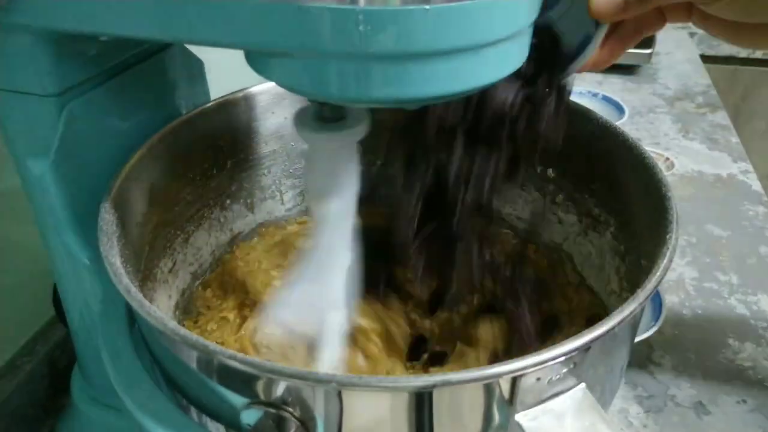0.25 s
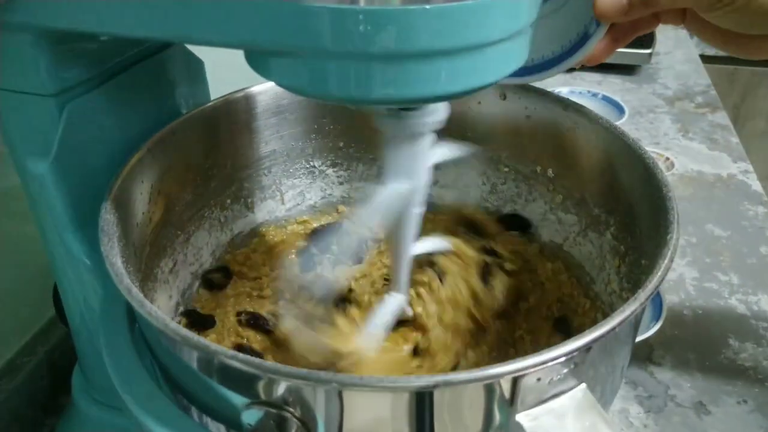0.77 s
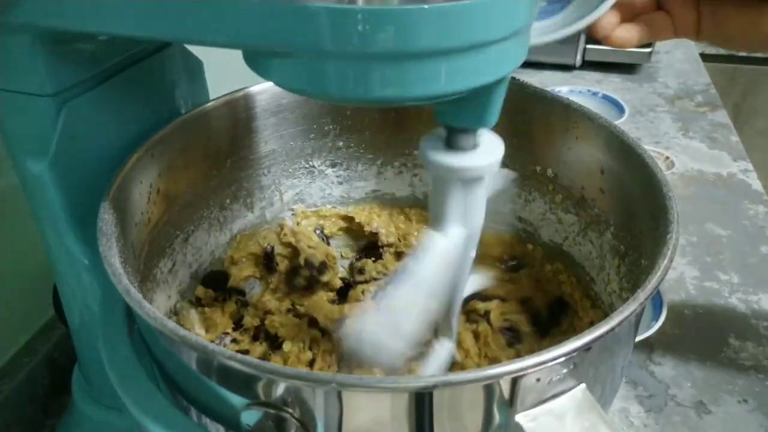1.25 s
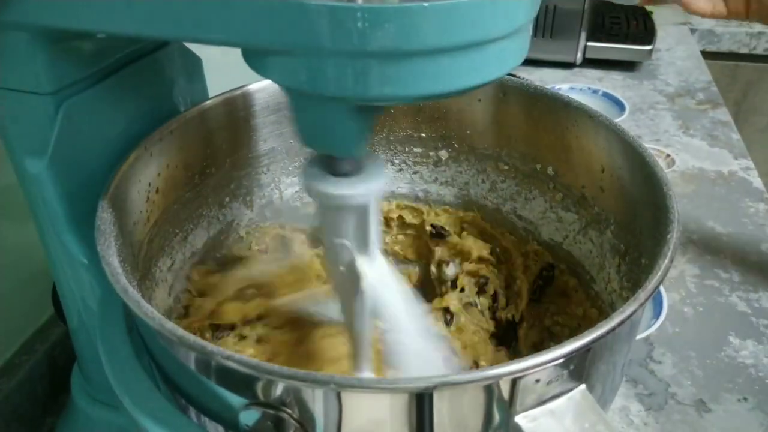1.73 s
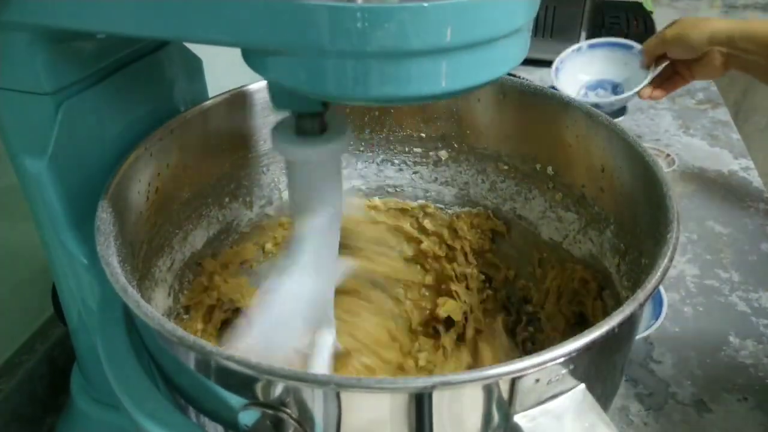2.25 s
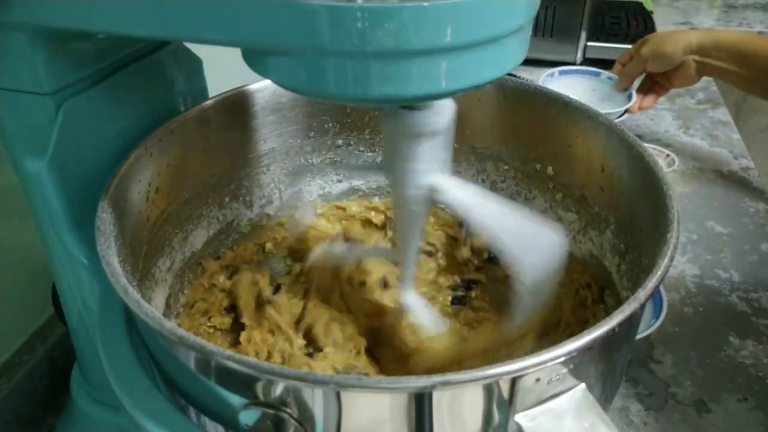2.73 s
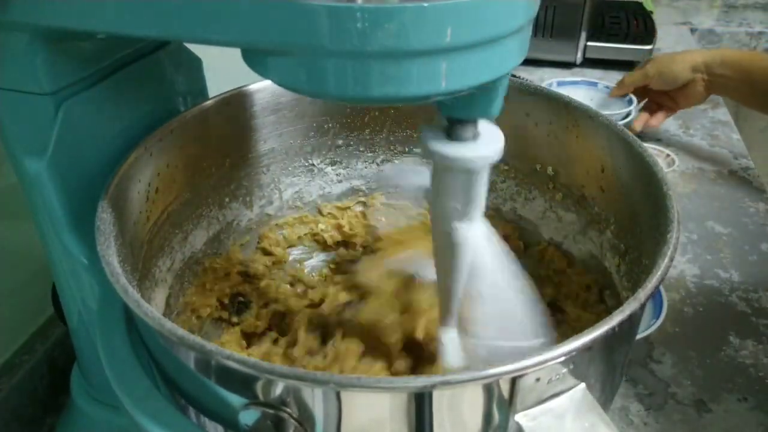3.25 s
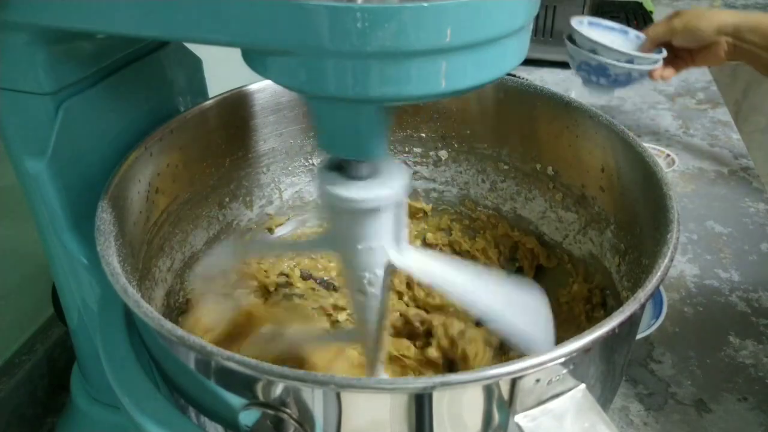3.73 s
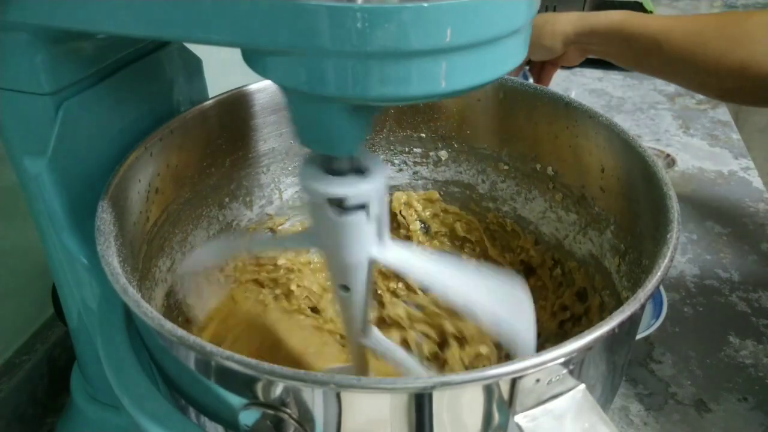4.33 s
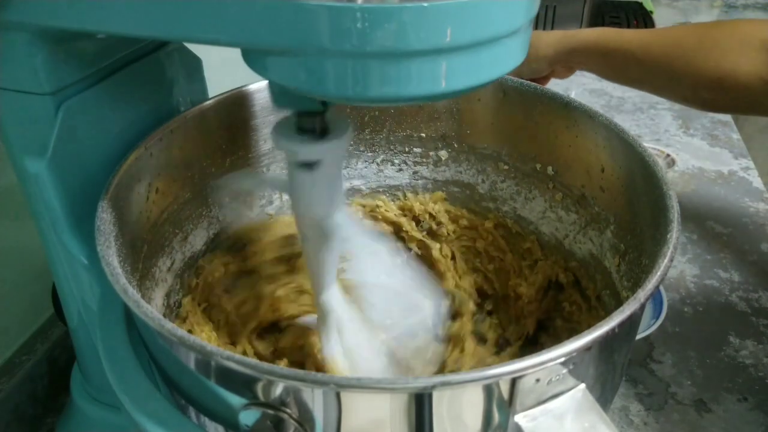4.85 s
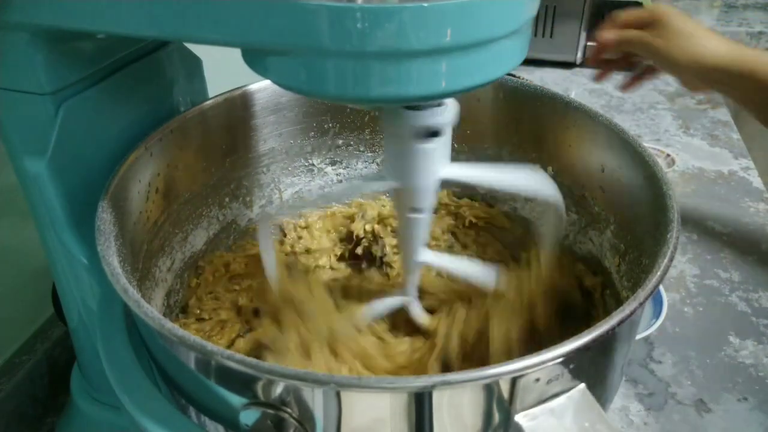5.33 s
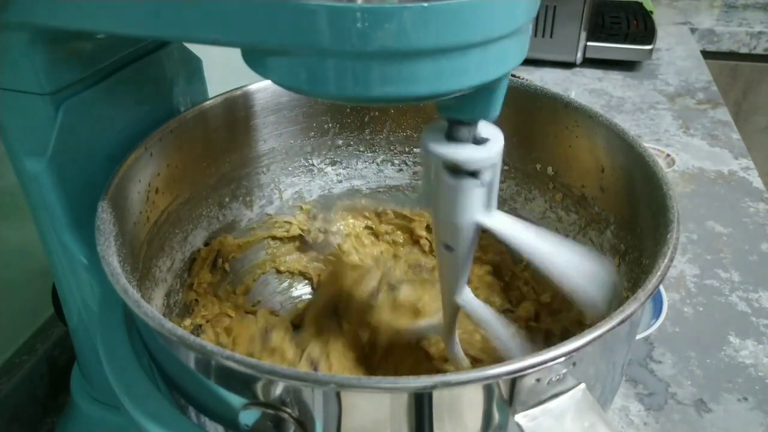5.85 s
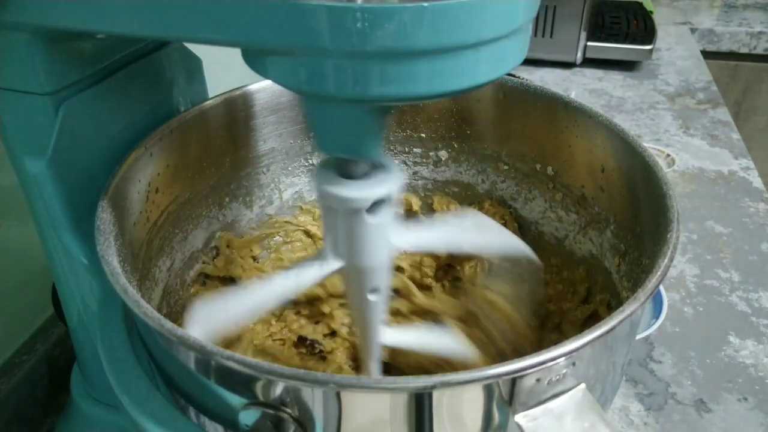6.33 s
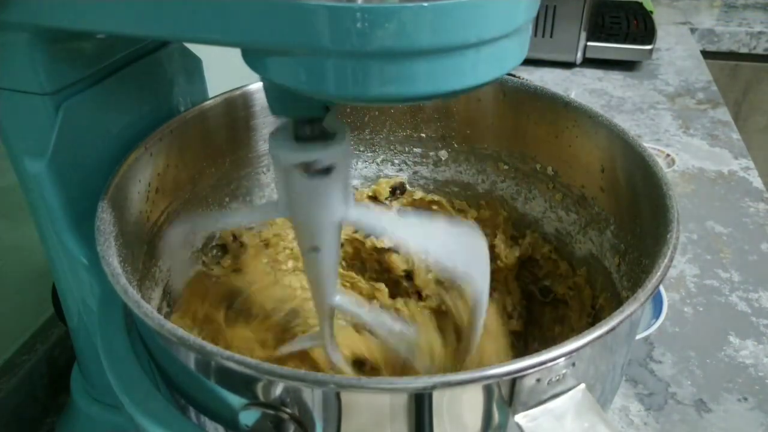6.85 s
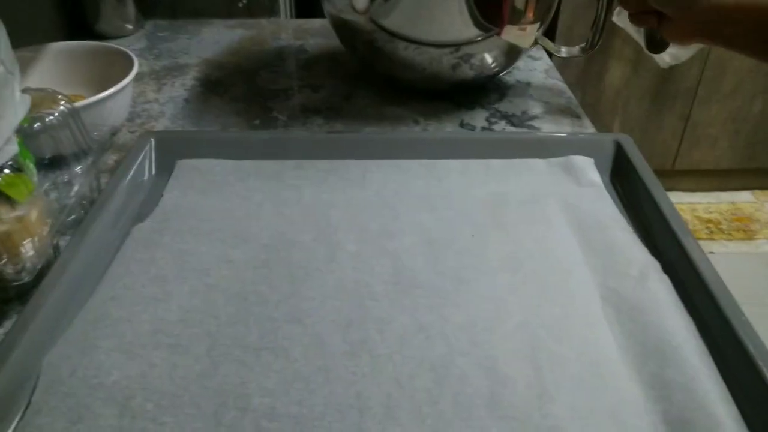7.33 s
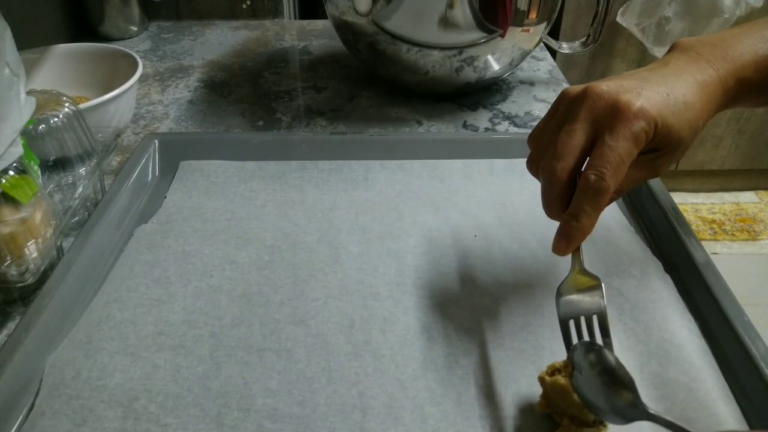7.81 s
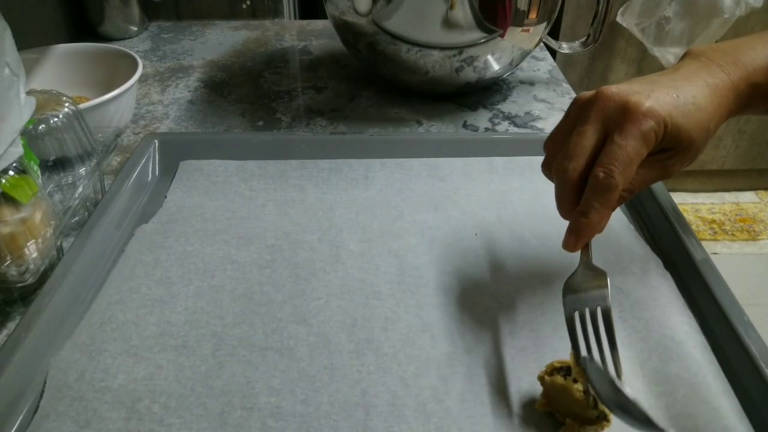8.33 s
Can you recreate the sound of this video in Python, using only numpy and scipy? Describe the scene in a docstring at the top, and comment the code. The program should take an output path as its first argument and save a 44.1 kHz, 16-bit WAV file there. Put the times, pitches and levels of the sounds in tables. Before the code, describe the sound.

From 0 to about 6 s a stand mixer runs close by at steady speed: dense, bright gear rattle with metallic housing resonances, wavering high whine and a low mains hum, fluttering slightly. Faint dish rings come at 0.3 and 0.7 s, dull knocks at 1.0 and 1.4-1.5, a china clink at 1.6, then a tight clatter of dishes and plate from 1.9 to 2.35. A bump comes at 3.4, a hard knock and clink at 3.65, after which the mixer dips and slowly recovers; another clink at 4.0, lighter taps at 4.9, 5.3 and 5.6. At 5.96 the mixer cuts off instantly. Quiet room tone, low appliance hum and a fading drone remain, with a soft rustle at 6.3 and a subtle splice at 7.4. From 8.2, a faint knock, rustling paper and short, bright, gritty spoon-and-fork scrapes continue to the end, around 8.6.

```python
"""In a kitchen, a stand mixer kneads dough in a steel bowl while small china dishes are stacked and set down.
Noise shaped by the housing makes its rattle; steady tones make its gear whine and mains hum. Dishes ring as fading
tones; knocks and scrapes are short puffs of noise. A cut leads to the quiet kitchen, two joined stretches of
room tone and an appliance's hum and drone, where a spoon and fork scrape dough off onto rustling baking paper."""
import sys
import numpy as np
from scipy import signal
from scipy.fft import rfft, irfft
from scipy.io import wavfile
from scipy.ndimage import uniform_filter1d

SR = 44100
rng = np.random.default_rng(int(sys.argv[2]) if len(sys.argv) > 2 else 0)


def gain_from_decibels(decibels):
    """Convert decibel values to linear amplitude factors."""
    exponent = np.asarray(decibels, float) / 20
    return 10 ** exponent


def file_out(sig):
    """Save sig as 16-bit WAV at sys.argv[1]."""
    # one column per channel
    cols = np.atleast_2d(sig).T
    # limit, then scale
    lim = np.clip(cols, -1, 1)
    pcm = np.round(lim * 32767).astype(np.int16)
    wavfile.write(sys.argv[1], SR, pcm)


N = 377937  # samples

SHAFT_HZ, ORBIT_HZ, MAINS_HZ = 33.59, 1.3, 100.1
CUT_S, SPLICE_S = 5.9635, 7.396  # the mixer is cut off; a second cut joins two stretches of quiet kitchen

# Relative spectrum of the gear rattle [f/Hz, level/dB per Hz]
RATTLE_SPECTRUM = [(22, -63.5), (38, -28.5), (60, -5), (110, -12), (170, -16.5), (277, -18), (340, -16),
                   (622, -16.5), (1020, -10.5), (1900, -11.5), (6720, -11), (10500, -12), (12000, -16),
                   (15400, -19)]
# Housing and bowl resonances, over the rattle [f/Hz, width/Hz, left level/dB, right level/dB]
HOUSING_MODES = [(128.8, 14, 4, 6), (194, 21, 1, 4.5), (327, 20, -4, 3), (452.5, 19.8, 5.5, 8),
                 (830, 33, -3, 8.5), (1024.3, 29.2, 16, 13), (1158, 30, 6.5, 4), (1217, 60, 6.5, 5),
                 (1457, 9.8, -9.5, 5.5), (1580, 22, 6.5, 9), (1690, 25, 11.5, 4.5), (1940, 46, 1.5, -1),
                 (2457, 45, 12, 5), (2750, 43, 5.5, 0), (3253, 66, 8, 4.5), (4160, 100, -9.5, 3.5),
                 (4810, 73, 7, 0.5), (5350, 80, 2, -7.5), (5490, 80, 6.5, 7), (6060, 50, 9, 7),
                 (6680, 71, 9.5, 7.5), (7120, 157, 7.5, -9), (9310, 81, 5, -6.5), (10250, 60, 8.5, 4.5),
                 (10740, 91, 9, 0.5), (14680, 180, 10.5, -3.5)]
# Mixer balance between the sides [f/Hz, left over right/dB]
MIXER_BALANCE = [(300, 1.5), (3000, -1), (6000, -0.5), (9500, 4), (12000, -0.5)]
# How alike the two sides hear the mixer [f/Hz, likeness 0 to 1]
MIXER_LIKENESS = [(130, 1), (290, 0.71), (900, 0.85), (1300, 0.29), (1800, 0.32), (2300, 0.11), (7000, 0.1),
                  (12000, 0.073)]
# Pitches of the gear whine [multiple of the shaft speed]
WHINE_ORDERS = 20.7, 24, 25, 30, 31, 33.7, 50.3, 72, 73, 74, 94.6, 96
# Strength of each whine pitch within the mixer [level/dB]
WHINE_LEVELS = -31.5, -20.5, -16.5, -17, -21.5, -23.5, -22, -19.5, -29.5, -31.5, -23.5, -32
# Dips of the mixer's level after the loudest clinks; a negative depth is a rise [t/s, depth/dB]
MIXER_DIPS = [(2.14, 2), (3.645, 7), (4.03, -0.5)]
# Names of the china, in the order of the ringing tones below
PIECES = "first dish", "second dish", "third dish", "plate"
# Ringing tones of three dishes and a plate, one list each [f/Hz, relative level/dB, time to fade 60 dB/s]
DISH_MODES = [
    [(3650, 0, .3), (3620, -8, .15), (5292, -9, .2), (5500, -8, .08)],
    [(3280, -5, .06), (3332, -3, .09), (5432, -2, .16), (5560, -5, .06), (6300, -2, .05), (6368, -1, .07),
     (7200, -8, .05), (8570, -4, .07), (9030, -6, .05), (9555, -6, .05), (10100, -8, .05)],
    [(3828, -22, .12), (5600, -5, .06), (5950, -5, .06), (6270, -3, .1), (6350, -6, .22), (9383, -2, .06),
     (10800, -10, .05)],
    [(600, -9, .08), (813, -7, .15), (950, -7, .1), (1174, -2, .07), (1350, -3, .07), (1453, -2, .09),
     (1580, -5, .07), (1707, -5, .11)],
]
# Blows on the china [t/s, piece, level/dB, hardness/dB per octave]
CLINKS = [(.29, "first dish", -34, 17), (.72, "first dish", -35.5, 20), (1.582, "first dish", -27.5, .1),
          (1.6, "first dish", -23.5, 1.5), (1.923, "third dish", -25.5, -5.5),
          (1.935, "third dish", -26.5, -3), (2.088, "plate", -19, 2.5), (2.1, "plate", -19.5, 6.5),
          (2.139, "second dish", -21, -0.5), (2.147, "second dish", -20.5, 2),
          (2.156, "second dish", -23.5, -1.2), (2.166, "second dish", -21.5, 1.5),
          (2.332, "third dish", -25, -3), (2.342, "third dish", -23, -3), (3.65, "third dish", -21.5, 1.5),
          (3.668, "third dish", -20.5, 6), (4.02, "third dish", -27.5, 11.5), (4.023, "plate", -30, -3),
          (5.29, "third dish", -26, 15.5)]
# Dull knocks on counter and bowl [t/s, peak level/dB, f/Hz, time to fade 60 dB/s]
KNOCKS = [(1.04, -24.5, 169, 0.27), (1.405, -17.5, 600, 0.15), (1.507, -10.5, 910, 0.13),
          (1.52, -23.5, 250, .25), (2.079, -11, 1460, 0.14), (3.393, -18, 990, 0.14),
          (3.642, -7.5, 1160, 0.05), (4.019, -15.5, 1100, 0.15), (4.915, -23.5, 500, 0.15),
          (5.62, -22.5, 790, 0.15), (8.22, -39, 340, 0.17)]
# Cutlery scraping [t/s, peak level/dB, f/Hz, time to fade 60 dB/s]
SCRAPES = [(8.317, -45, 6350, .025), (8.342, -43, 10500, .02), (8.353, -46, 10000, .02),
           (8.387, -28.5, 6500, 0.042), (8.4, -38, 4000, .03), (8.445, -26, 10000, .015),
           (8.462, -22.5, 7000, 0.045), (8.476, -33, 4960, .04), (8.515, -36, 6000, .02),
           (8.536, -27, 5000, 0.04)]
# Sleeve and paper rustles, before the kitchen's side balance [peak t/s, peak level/dB, 20 dB rise/s, 20 dB fall/s]
RUSTLES = [(6.33, -59.5, 0.16, .2), (7.0, -68, .3, .25), (7.3, -75, .2, .13), (8.24, -64, .1, .1),
           (8.319, -53.5, .004, .5), (8.395, -46.5, 0.055, .2), (8.468, -42, .04, .12),
           (8.57, -45.5, .15, .1)]
# Relative spectrum of rustling paper [f/Hz, level/dB per Hz]
PAPER_SPECTRUM = [(500, -33), (1200, -8.5), (3000, -5.5), (5750, -7), (10400, -5), (15400, -12.5)]
# Relative spectrum of the quiet room [f/Hz, level/dB per Hz]
ROOM_SPECTRUM = [(22, -65), (38, -25), (60, -9.5), (140, -15), (177, -20.5), (240, -19.5), (324, -27),
                 (767, -26), (1470, -30), (2600, -35.5), (3980, -43.5), (9000, -49.5), (15400, -56.5)]
# How alike the two sides hear the room and the rustles [f/Hz, likeness 0 to 1]
ROOM_LIKENESS = [(130, 0.96), (290, 0.76), (450, 0.8), (700, 0.34), (1500, 0.19), (3000, .05)]
# Treble notches of the microphone port [f/Hz, width/Hz, level/dB]
MIC_NOTCHES = [(7870, 620, -3), (8020, 180, -10.5)]


def mixer():
    """Loose gears rattle, meshing gears whine and the motor iron hums, all sharing one level."""
    turns = np.cumsum(SHAFT_HZ * (1 + .0016 * drift(ms=100))) / SR  # the shaft speed wanders a little
    sound = gear_rattle(turns) + gear_whine(turns) + motor_hum()
    return gain_from_decibels(-19 + mixer_dips_db()) * sound


def gear_rattle(turns):
    """Loose gear teeth shake the housing, stronger and weaker in time with shaft and beater."""
    t = np.arange(N) / SR
    beater_db = 0.17 * np.sin(2 * np.pi * ORBIT_HZ * t + 1.3)
    shaft_db = 0.37 * np.sin(2 * np.pi * turns)
    load_db = beater_db + shaft_db + 0.41 * drift(ms=18)
    chatter_db = 0.84 * drift(ms=3.8)  # uneven tooth blows
    blows = rng.standard_normal((2, N)) * gain_from_decibels(load_db + chatter_db)
    rattle = coloured(blows, RATTLE_SPECTRUM, MIXER_LIKENESS, 0.00022, HOUSING_MODES)
    hz = np.fft.rfftfreq(N, 1 / SR)
    balance_db = np.outer([.5, -.5], read(MIXER_BALANCE, hz))
    return irfft(rfft(rattle) * gain_from_decibels(balance_db), N)


def gear_whine(turns):
    """Meshing gears sing at multiples of the shaft speed, each tone wavering in level."""
    heard = turns - SHAFT_HZ * np.array([[0], [2.8e-4]])  # the right port hears it 0.28 ms later
    whine = np.zeros((2, N))
    for order, level_db in zip(WHINE_ORDERS, WHINE_LEVELS):
        own_waver = np.array([drift(ms=35), drift(ms=35)])
        waver_db = 3 * drift(ms=35) + 2.5 * own_waver  # part shared, part for each side
        whine += gain_from_decibels(level_db + waver_db) * np.sin(2 * np.pi * (order * heard + rng.random()))
    return whine


def motor_hum():
    """Mains current makes the motor iron hum on one low tone."""
    t = np.arange(N) / SR
    return gain_from_decibels(-12 + 0.39 * drift(ms=35)) * np.sin(2 * np.pi * MAINS_HZ * t)


def mixer_dips_db():
    """Each dip in level falls fast, holds and creeps back."""
    fall_s, hold_s, return_s = 0.093, 0.042, 0.89
    s, depth_db = np.transpose(MIXER_DIPS)[..., None]
    since = np.arange(N) / SR - s
    fall = np.clip(since / fall_s, 0, 1)
    back = np.exp(-np.maximum(since - fall_s - hold_s, 0) / return_s)
    return -(depth_db * fall * back).sum(0)


def clinks():
    """Each blow rings the tones of its dish with a noisy tick; echoes off counter and walls roughen it."""
    out, t = np.zeros(N), np.arange(SR // 2) / SR
    for s, piece, level_db, hardness in CLINKS:
        hz, mode_db, t60 = np.transpose(DISH_MODES[PIECES.index(piece)])[..., None]
        tilt_db = hardness * np.log2(hz / hz.mean())  # a harder blow favours the high tones
        tones = np.sin(2 * np.pi * (hz * t + rng.random(hz.shape)))
        ring = gain_from_decibels(mode_db + tilt_db - 60 * t / t60) * tones
        tick = 1.36 * rng.standard_normal(len(t)) * gain_from_decibels(-60 * t / 0.067)
        # Pieces with lower tones tick duller
        tick = signal.lfilter(*signal.butter(2, 2 * hz.mean(), fs=SR), tick)
        add(out, s, gain_from_decibels(level_db) * (ring.sum(0) + tick))
    return signal.oaconvolve(out[None], scattered_echoes(), axes=1)[:, :N]


def scattered_echoes():
    """The direct sound, then sparse random reflections that die away, different on each side."""
    t = np.arange(SR // 5) / SR
    present = rng.random((2, len(t))) < .04
    echoes = rng.standard_normal((2, len(t))) * present * gain_from_decibels(-60 * t / .12)
    echoes *= .55 / np.linalg.norm(echoes, axis=1, keepdims=True)
    echoes[:, 0] = 1  # direct sound
    return echoes


def knocks():
    """Counter and bowl answer a bump with a dull, broad resonance."""
    return bursts(KNOCKS, breadth=1.185, same=0.58, rise_s=0.0033, grit_db=2.0)


def scrapes():
    """Spoon and fork rub in short, bright, gritty strokes."""
    return bursts(SCRAPES, breadth=2.1, same=0.39, rise_s=0.00054, grit_db=1.5)


def kitchen():
    """Rustles, appliance and room tone, slightly stronger on the right, in two stretches joined by a cut."""
    t = np.arange(N) / SR
    splice = 1 - 1.1 * np.exp(-((t - SPLICE_S) / 0.0056) ** 2)  # a very short dip in sound at the cut
    balance = gain_from_decibels([[-.7], [.7]])  # left, right
    return (rustles() + appliance_drone() + appliance_hum() + room_tone()) * balance * splice


def rustles():
    """Sleeve and paper crinkle: uneven noise that swells and falls away."""
    crinkle = rng.standard_normal((2, N)) * gain_from_decibels(2.0 * drift(ms=1.67))
    return swells(RUSTLES) * coloured(crinkle, PAPER_SPECTRUM, ROOM_LIKENESS, -1.8e-4)


def appliance_drone():
    """A tone of wavering level, with its own pitch and level before and after the second cut."""
    t = np.arange(N) / SR
    late = (t > SPLICE_S).astype(int)  # picks the first or second value of each pair
    hz = np.take((239, 233), late)
    since = t - np.take((CUT_S, SPLICE_S), late)
    level_db = np.take((-59, -56.5), late) + np.take((-7.5, 0.5), late) * since  # start, then dB per second
    return gain_from_decibels(level_db + 4.5 * drift(ms=20)) * np.sin(2 * np.pi * np.cumsum(hz) / SR)


def appliance_hum():
    """An appliance hums on one low mains tone."""
    t = np.arange(N) / SR
    return gain_from_decibels(-50 + 0.8 * drift(ms=30)) * np.sin(2 * np.pi * MAINS_HZ * t)


def room_tone():
    """The quiet room is soft, mostly low noise with one resonance."""
    resonance = [(487, 50, 4.4, 8.1)]  # f/Hz, width/Hz, left level/dB, right level/dB
    noise = rng.standard_normal((2, N))
    return gain_from_decibels(-53.5) * coloured(noise, ROOM_SPECTRUM, ROOM_LIKENESS, -0.0002, resonance, patchy_db=0.5)


def bursts(rows, breadth, same, rise_s, grit_db):
    """Short puffs of noise, each passed twice through one broad resonance."""
    out, t = np.zeros((2, N)), np.arange(SR // 4) / SR
    for s, peak_db, hz, t60 in rows:
        grains = rng.exponential(size=len(t) // 32 + 1).repeat(32)[:len(t)]  # uneven grains of 32 samples
        a, b = rng.standard_normal((2, len(t))) * gain_from_decibels(grit_db * grains)
        puff = np.array([a, same * a + np.sqrt(1 - same ** 2) * b])  # the right side shares part of the left
        band = signal.iirpeak(hz, 1 / breadth, SR)
        puff = signal.lfilter(*band, signal.lfilter(*band, puff))
        puff = puff * gain_from_decibels(-60 * t / t60) * np.minimum(t / rise_s, 1)
        add(out, s, gain_from_decibels(peak_db) * puff / abs(puff).max())
    return out


def swells(rows):
    """Each row rises to its peak and falls away; their powers add."""
    s, peak_db, rise_s, fall_s = np.transpose(rows)[..., None]
    since = np.arange(N) / SR - s
    below_peak_db = 20 * np.maximum(since / fall_s, -since / rise_s)
    return np.sqrt((gain_from_decibels(peak_db - below_peak_db) ** 2).sum(0))


def coloured(drive, colour, same, lag_s, modes=(), patchy_db=1.5):
    """Two unrelated drives get a spectrum, resonances and drifting patches; the right shares part of the left."""
    hz, _, (a, b) = signal.stft(drive, SR, nperseg=2048, noverlap=1536)
    share = np.clip(read(same, hz), 0, 1)[:, None]
    late = np.exp(-2j * np.pi * hz * lag_s)[:, None]  # the right port hears it lag_s later
    z = np.array([a, share * late * a + np.sqrt(1 - share ** 2) * b])
    peaks_db = np.zeros((2, len(hz)))
    for f, width, *db in modes:
        bell = 1 / (1 + (2 * (hz - f) / width) ** 2)
        extra_power = gain_from_decibels(np.array(db)) ** 2 - 1
        peaks_db += 10 * np.log10(1 + np.outer(extra_power, bell))
    # Patches of time and pitch grow stronger and weaker
    patches = rng.standard_normal(a.shape)
    patches = evened(uniform_filter1d(uniform_filter1d(patches, 20, 0), 6, 1))
    z = z * gain_from_decibels((read(colour, hz) + peaks_db)[..., None] + patchy_db * patches)
    return evened(signal.istft(z, SR, nperseg=2048, noverlap=1536)[1][:, :N])


def drift(ms):
    """Smooth random wandering of rms 1: noise averaged twice over ms milliseconds."""
    size = int(ms * SR / 1000)
    return evened(uniform_filter1d(uniform_filter1d(rng.standard_normal(N), size), size))


def evened(x):
    """Scales a sound to rms 1."""
    return x / np.sqrt(np.mean(x ** 2) + 1e-20)


def read(points, hz):
    """Reads a table at these frequencies, along a logarithmic frequency scale."""
    f, value = np.transpose(points)
    return np.interp(np.log(hz + 1), np.log(f + 1), value)


def add(mix, s, sound):
    """Adds a sound into the mix from s seconds on, cut off at the end."""
    part = mix[..., round(s * SR):][..., :sound.shape[-1]]
    part += sound[..., :part.shape[-1]]


def scene():
    """Mixer and dishes up to the cut, then the quiet kitchen; knocks throughout, and scrapes near the end."""
    before = np.clip((CUT_S - np.arange(N) / SR) / 0.00086, 0, 1)  # a crossfade of under 1 ms
    return before * (mixer() + clinks()) + (1 - before) * kitchen() + knocks() + scrapes()


def band_limit(x):
    """A steep low-pass at the top of the band."""
    return signal.sosfilt(signal.butter(12, 16260, fs=SR, output="sos"), x)


def record(dry):
    """The microphone port has a notch in the treble and a steep top edge."""
    hz = np.fft.rfftfreq(N, 1 / SR)
    port_db = sum(db / (1 + (2 * (hz - f) / width) ** 2) for f, width, db in MIC_NOTCHES)
    edge = np.clip((15500 - hz) / 150, 0, 1)  # silent above 15500 Hz
    mix = irfft(rfft(dry) * gain_from_decibels(port_db) * edge, N)
    return band_limit(mix)


dry = scene()
out = record(dry)
file_out(out)
```